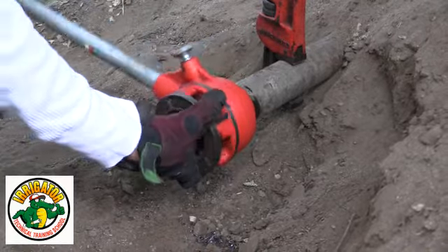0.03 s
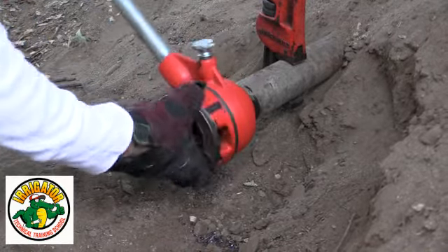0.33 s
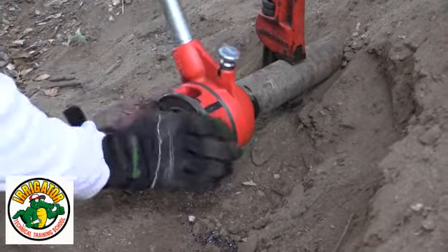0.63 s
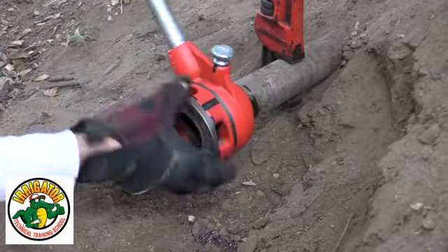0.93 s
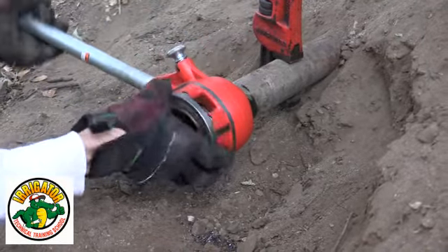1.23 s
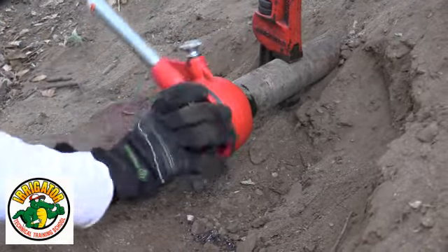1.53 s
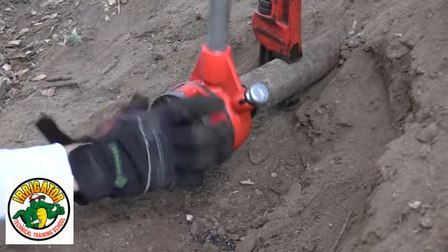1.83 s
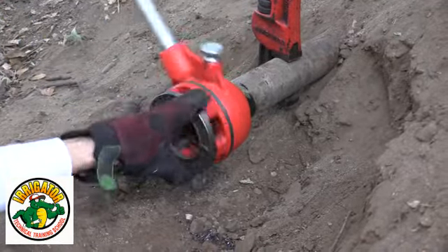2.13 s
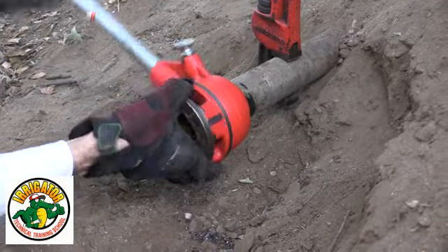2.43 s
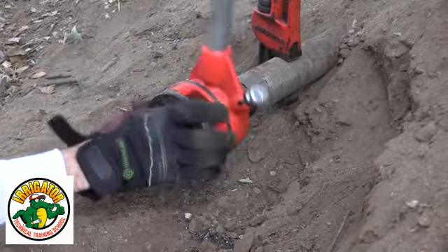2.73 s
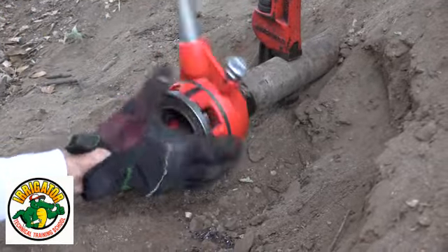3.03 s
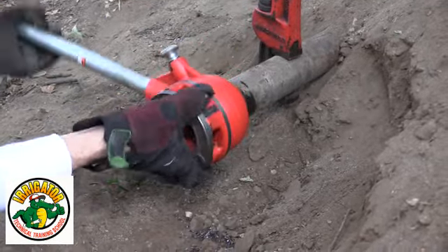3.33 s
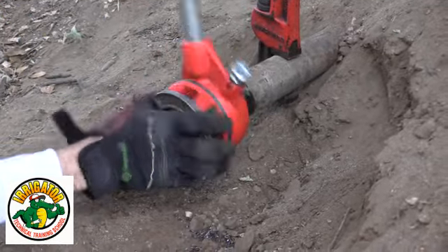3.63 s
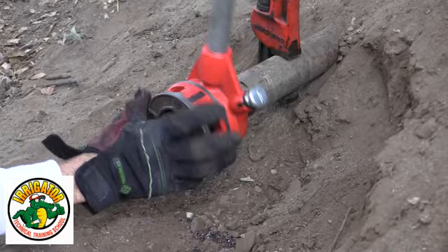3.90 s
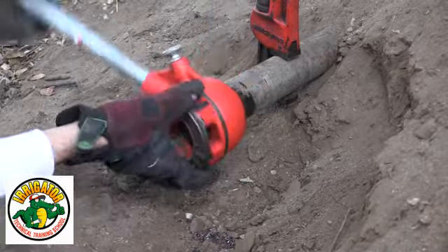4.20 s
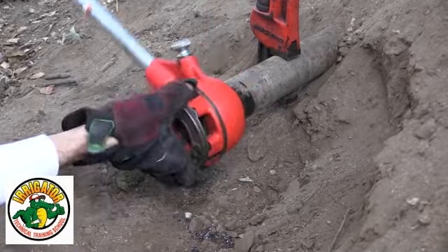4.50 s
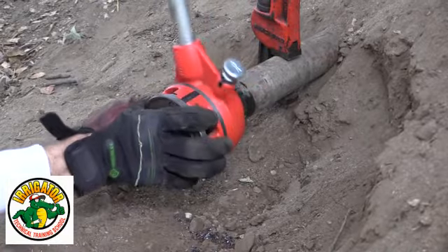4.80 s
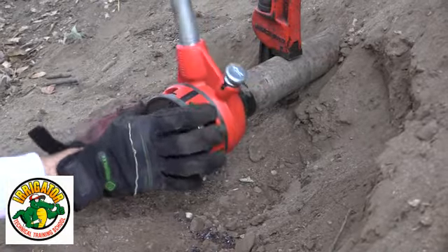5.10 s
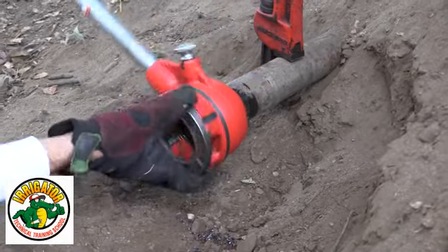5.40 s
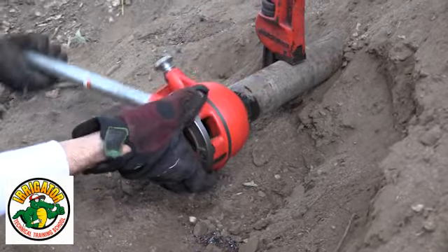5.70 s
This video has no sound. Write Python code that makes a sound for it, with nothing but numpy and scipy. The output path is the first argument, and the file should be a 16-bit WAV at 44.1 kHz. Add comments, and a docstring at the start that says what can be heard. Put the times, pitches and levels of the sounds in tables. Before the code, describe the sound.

A hand ratcheting pipe threader is worked off a steel pipe, close by in an earth trench, heard in the left channel only. A metal knock and soft glove bumps come at about 0.1 seconds. Then the ratchet clicks in five quick, slightly uneven bursts of seven to nine sharp, briefly ringing clicks: at 0.4 to 0.8, 1.5 to 1.9, 2.6 to 2.9, 3.6 to 3.8 and 4.6 to 5.0 seconds. These are the loudest sounds. Between bursts the loose head gives softer, duller knocks, around 1.3, 2.1, 2.4 and 3.4 seconds, with the strongest clunk at 4.3. The die rubs faintly and grittily on the thread with each stroke. Gloves brush the tool, most clearly near 0.8 seconds, and bump it with muffled thuds. A light breeze rumbles faintly throughout. A low thump and a few faint knocks come at about 5.6 seconds.

```python
"""In an earth trench, close by, a ratcheting pipe threader is backed off a steel pipe. On each return
swing the spring pawl drops over the teeth, and each impact excites the damped modes of the die head.
On each working stroke the loose head knocks as it takes up its play, and sliding friction makes the
die rub softly along the thread. Gloves bump and brush the tool, and moving air rumbles underneath.
The scene sounds in the left channel only."""
import sys
import numpy as np
from scipy import signal
from scipy.fft import rfft, irfft, next_fast_len
from scipy.io import wavfile
from scipy.ndimage import uniform_filter1d

SR = 44100
rng = np.random.default_rng(int(sys.argv[2]) if len(sys.argv) > 2 else 0)


def generate_wav(signal):
    """Clip the signal to [-1, 1] and save it as 16-bit WAV at the path in sys.argv[1]."""
    frames = np.transpose(np.atleast_2d(signal))
    scaled = np.clip(frames, -1, 1) * 32767
    pcm = np.round(scaled).astype(np.int16)
    wavfile.write(sys.argv[1], SR, pcm)


N = 253573
RING_SAMPLES = 12000  # length of one free vibration


# pawl impacts: t/s, level/dB, decay time factor, spectral tilt/(dB per octave), ping near 5 kHz/dB
PAWL_DROPS = [(0.4075, -21, 0.87, -0.5, 11.5), (0.4906, -20, 0.93, -1.5, 11),
              (0.5534, -19.5, 0.87, 0.4, 7.5), (0.6007, -21, 1.12, -0.3, 3), (0.6379, -20, 1.1, -0.3, 9),
              (0.676, -24.5, 1.1, 0.6, 1.5), (0.788, -29, 0.65, -1.5, 9), (1.5102, -17.5, 0.71, -1.5, -8.5),
              (1.5474, -18, 1.04, -0.1, 1.5), (1.583, -19.0, 1.4, -0.7, 3), (1.6202, -16.5, 0.95, 0.2, 3.5),
              (1.6616, -22, 0.77, 0, -5.5), (1.755, -21, 0.92, 1.5, 2.5), (1.8362, -21, 1.6, 0.4, 0),
              (1.928, -20, 0.9, 1.5, -5), (2.5647, -20.5, 0.86, -0.5, 16.5),
              (2.6112, -23.5, 0.85, -0.5, 13), (2.6619, -22.5, 1.2, -0.2, 5.5),
              (2.6977, -20, 0.77, 0.7, -4), (2.7293, -21.5, 0.77, 2.5, -10.5),
              (2.7639, -25.5, 0.68, 0.6, -1), (2.821, -22.5, 1.13, -0.3, -1.5), (2.8539, -21, 0.9, -0.6, 8),
              (2.8849, -25.0, 1.33, 0, 2), (3.5682, -18, 0.95, 0, 3.5), (3.6046, -17, 1.1, -0.1, 3),
              (3.6341, -20.5, 0.77, -1, -2), (3.6643, -20, 0.78, 0.3, -10), (3.7034, -19, 0.95, 0, 6),
              (3.7343, -19.0, 1.6, 1, -3.5), (3.7617, -21, 1.1, 1.5, -12), (3.7888, -20.5, 0.9, 0.6, -2.5),
              (3.8421, -25.5, 1, -0.5, 7), (4.6278, -21, 0.57, 1, 0), (4.725, -16.5, 0.68, -0.5, 6),
              (4.7576, -21.5, 1.1, -1, 15), (4.7815, -21.0, 1.5, -0.2, -10), (4.805, -23.5, 1.3, -0.3, 4),
              (4.834, -22, 1.04, 1, -7), (4.8742, -25.0, 0.88, 0.5, 2.5), (4.9862, -24, 0.68, 0, 4)]
# band edges of a drop: f/Hz
PAWL_EDGES = [50, 350, 2000, 2550, 4700, 5700, 9500, 17000]
# spectrum of a plain drop, by band: level/dB
PAWL_SPECTRUM = [-25, -8, -13, -1.5, -7.3, 0, -3]
# the duller spectrum of a rebound, by band: gain/dB
REBOUND_GAINS = [5, 9, 8, 3.5, -14, -5, -7]

def pawl(tones):
    """Impact excitation: the sprung pawl scrapes over a tooth, snaps down and rebounds once, weakly."""
    out, filters = np.zeros(N), bands(PAWL_EDGES)
    head_band, ping_band = 2, 4  # near 2.2 kHz and 5 kHz
    t = np.arange(RING_SAMPLES // 10) / SR
    tooth, last_s = 0, -np.inf
    for s, db, ring, tilt, ping_db in PAWL_DROPS:
        tooth = tooth + 1 if s - last_s < .4 else 0  # a longer gap begins a new swing
        last_s = s
        band_db = tilted(PAWL_SPECTRUM, PAWL_EDGES, tilt, pivot_hz=4000)
        # the head rings more as the handle rises, fully so once the die has worked loose
        band_db[head_band] += 1.61 * tooth * looseness(s)
        band_db[ping_band] += ping_db
        sound = impact(tones, ring, modes_db=3.3, rise_s=.0002, crack_db=8, body_t60=.043,
                       tail_db=-13.5, tail_t60=.19, scatter_db=8, detune=1.5)
        add(out, s, undb(db) * partition(sound, filters, band_db))
        delay_s, rebound_db = rng.uniform(.016, .027), rng.uniform(-27, -24.5)
        rebound = partition(sound, filters, band_db + REBOUND_GAINS)
        add(out, s + delay_s, undb(db + rebound_db) * rebound)
        scrape = unit(colour(rng.standard_normal(len(t)), BODY_SPECTRUM)) * fade(t, .051)[::-1]
        add(out, s - len(t) / SR, undb(db - 22.5) * scrape)
    return out


# impacts of head and handle: t/s, level/dB, spectral tilt/(dB per octave), clunk of the head/dB
HEAD_KNOCKS = [(0.1205, -46, -5, -5), (0.1359, -35, -5.5, -3), (0.1423, -25, 0.5, -6),
               (0.181, -46.5, -6.5, -12), (0.2531, -38, -0.5, -23), (0.335, -38.5, 1, -5),
               (0.358, -41.5, -1, -10), (1.027, -46.5, -2, 9.5), (1.315, -31, -2, 4),
               (1.3326, -42.5, 3.5, -3), (2.0769, -35.5, 4, -1), (2.109, -38, 2, -2),
               (2.116, -31, 0.5, 3.5), (2.358, -37, -2.5, -6), (2.39, -34, 0, 8), (2.471, -46, 5, 12.5),
               (2.498, -45.5, 8, 4), (2.525, -40.5, 1.5, -9), (3.27, -40, 4.5, -1), (3.3496, -34, 4, -3),
               (3.3629, -26.5, -1, 1.5), (3.461, -35.5, 2.5, -3), (3.547, -37, -0.5, -12.5),
               (3.898, -43.5, 1, -16), (4.2675, -34, 1.5, -0.5), (4.286, -29, 0, -9),
               (4.2909, -22.5, 1.4, 8), (4.299, -34.5, -2, 11.5), (4.3255, -39.5, -0.5, 1),
               (4.374, -42, -3, 10), (4.485, -42.5, 3.5, 4), (4.553, -35, 3.5, 7.5),
               (4.607, -40.5, 4.5, -6.5), (5.206, -49.5, -1, 6.5), (5.63, -45, -5.5, 0),
               (5.653, -46, -1, -4), (5.671, -48.5, -8, -17)]
# band edges of a knock: f/Hz
KNOCK_EDGES = [50, 350, 1250, 2200, 4500, 9500, 17000]
# spectrum of a plain knock, by band: level/dB
KNOCK_SPECTRUM = [-9, -4.5, -4, -0.5, -7, -16]

def knocks(tones):
    """Backlash: head and handle take up their play in softer, duller impacts, each with some chatter."""
    out, filters = np.zeros(N), bands(KNOCK_EDGES)
    clunk_band = 2  # 1.25-2.2 kHz
    for s, db, tilt, clunk_db in HEAD_KNOCKS:
        band_db = tilted(KNOCK_SPECTRUM, KNOCK_EDGES, tilt, pivot_hz=2200)
        band_db[clunk_band] += clunk_db
        sound = impact(tones, ring=.62, modes_db=-3, rise_s=.0017, crack_db=5, body_t60=.042,
                       tail_db=-18, tail_t60=.13, scatter_db=16, detune=2.4)
        knock = undb(db) * partition(sound, filters, band_db)
        add(out, s, knock)
        for chatter_s in .014 * rng.uniform(-.44, 1, 3):
            add(out, s + chatter_s, undb(-11.5) * rng.uniform(-.78, 1) * knock)
    return out


# spectral envelope of the dense, short-lived modes of casting, handle and pipe: f/Hz, level/dB
BODY_SPECTRUM = [(60, -20.5), (190, -3.5), (300, -19), (520, -6.5), (1000, -7.5), (1900, -3.5),
                 (3200, -3.5), (4000, -6.5), (5800, 0), (7600, -4.5), (9800, -10.5), (12600, -10),
                 (14000, -17.5), (16000, -24)]

def impact(tones, ring, modes_db, rise_s, crack_db, body_t60, tail_db, tail_t60, scatter_db, detune):
    """Impulse response of steel: overlapping modes merge into a clack, while separate ones ring clear."""
    t = np.arange(RING_SAMPLES) / SR
    dense = colour(rng.standard_normal(RING_SAMPLES), BODY_SPECTRUM)
    clack = unit(dense * (fade(t, body_t60 * ring) + undb(crack_db) * fade(t, .0024)))
    head = unit(head_modes(t, ring, scatter_db, detune))
    # the trench walls scatter a dull, noisy echo in among the ringing
    echo = colour(rng.standard_normal(RING_SAMPLES),
                  [(200, 2.5), (1000, 1), (2000, -2.5), (3300, 3), (4600, -17), (6500, -10),
                   (7600, -8.5), (14000, -21.5)])
    tubes = unit(rng.standard_normal(len(tones)) @ tones)
    tail = unit((tubes + unit(echo)) * fade(t, tail_t60))
    attack = 1 - np.exp(-t / rise_s)
    return (clack + undb(modes_db) * head + undb(tail_db) * tail) * attack


# normal modes of die head and pawl: f/Hz, energy level/dB, nominal T60/s
HEAD_MODES = [(505, -26, .06), (975, -20.5, .07), (1230, -20, .06), (1450, -17, .05), (1775, -15.5, .07),
              (2195, -8, .06), (2320, -12, .06), (2700, -12, .055), (3065, -14, .06), (3180, -25, .23),
              (3320, -20, .07), (3540, -20, .06), (4200, -31, .2), (5070, -13, .035), (5250, -3, .04),
              (5470, -15, .045), (6080, -13, .045), (6750, -7.5, .062), (8145, -10, .052), (8425, -11, .05),
              (10360, -15.5, .08), (11080, -14, .06), (11300, -20, .07), (12320, -13.5, .068),
              (12860, -12, .06), (13660, -23, .06), (14140, -39, .32), (14935, -23, .07), (15310, -26, .08)]

def head_modes(t, ring, scatter_db, detune):
    """Modal superposition: damped sinusoids whose strength and pitch vary with contact point and grip."""
    hz, db, t60 = np.transpose(HEAD_MODES)[:, :, None]
    strength, pitch = rng.standard_normal((2, len(HEAD_MODES), 1))
    phase = rng.uniform(0, 2 * np.pi, (len(HEAD_MODES), 1))
    hz = hz + detune * pitch / t60  # heavily damped modes lean on the contact and shift most
    t60 = ring * t60 * np.exp(rng.uniform(-.8, .23, t60.shape))  # the glove damps each mode differently
    amplitude = undb(db + scatter_db * np.tanh(strength)) / np.sqrt(t60)
    waves = np.sin((2 * np.pi * hz * t + phase).astype(np.float32))
    return np.sum(amplitude * fade(t, t60) * waves, axis=0)


def tube_tones(count=70):
    """Natural frequencies of handle and pipe: many thin, steady tones, one a row."""
    hz = rng.uniform(700, 7200, (count, 1))
    db = np.interp(hz, [700, 1800, 3100, 4500, 7200], [2.5, -7.5, -5.5, -1.5, -5.5])
    phase = rng.uniform(0, 2 * np.pi, (count, 1))
    return undb(db) * np.sin(2 * np.pi * hz * np.arange(RING_SAMPLES) / SR + phase)


def tilted(band_db, edges_hz, db_per_octave, pivot_hz):
    """Contact stiffness: a harder contact tilts the band levels towards the treble."""
    centres_hz = np.sqrt(np.multiply(edges_hz[:-1], edges_hz[1:]))
    return band_db + db_per_octave * np.log2(np.maximum(centres_hz, 550) / pivot_hz)


def partition(sound, filters, band_db):
    """Energy partition: the contact point sets each band's level over the first 20 ms of an impact."""
    parts = np.array([signal.sosfilt(sos, sound) for sos in filters])
    onset_rms = np.sqrt(np.mean(parts[:, :int(.02 * SR)] ** 2, axis=1))
    return (undb(band_db) / onset_rms) @ parts


def looseness(s, loose_at_s=3.1):
    """Mechanical clearance: the die's play on the thread grows from 0 to 1 with time s."""
    return np.minimum(s / loose_at_s, 1) ** 2


# spectrum of steel sliding on the thread: f/Hz, level/dB
FRICTION_SPECTRUM = [(300, 1), (700, 1), (1000, 0), (1600, -1), (2100, -1), (2650, -3), (4400, 0),
                     (6000, -3), (8500, -6), (12000, -10), (16000, -16)]
# pipe resonances under a fully loose die: f/Hz, bandwidth/Hz, level/dB relative to the rub
PIPE_RESONANCES = [(2170, 54, -8), (3110, 25, -10.5), (4170, 380, -11.5)]

def sliding_die(rub_db, hiss_db):
    """Forced vibration: gritty friction on the thread drives head and pipe, more as the die rubs harder."""
    grit = (rng.random(N) < 260 / SR) * rng.standard_normal(N)  # about 260 specks a second
    friction = rng.standard_normal(N) * undb(2.4 * walk(41) + 1.5 * walk(1500)) + undb(-12) * unit(grit)
    t, ringing = np.arange(RING_SAMPLES) / SR, 0
    for _ in range(4):  # four cutters bear unevenly on the pipe, each stirring its own mix of modes
        response = unit(head_modes(t, ring=.71, scatter_db=10, detune=3))
        load = undb(4 * np.tanh(walk(13)))
        ringing = ringing + signal.fftconvolve(friction * load, response)[:N]
    ringing = colour(ringing, [(1000, -4), (1600, 1), (2300, -4), (3300, 0), (4200, 2), (5200, -10),
                               (14000, -16)])
    ringing_db = -13.5 + .92 * (rub_db - np.mean(rub_db))
    sound = unit(colour(friction, FRICTION_SPECTRUM)) + undb(ringing_db) * unit(ringing)
    rub, hiss = (unit(signal.sosfilt(sos, sound)) for sos in bands([350, 3000, 17000]))
    pipe = sum(undb(db) * unit(signal.lfilter(*signal.iirpeak(hz, hz / width, fs=SR), friction))
               for hz, width, db in PIPE_RESONANCES)
    return undb(rub_db) * (rub + looseness(np.arange(N) / SR) * pipe) + undb(hiss_db) * hiss


# handle strokes: t/s leaving the top, t/s lowest, t/s back at the top, peak rub/dB, hiss/dB, rumble/dB
HANDLE_STROKES = [(-0.1, 0.329, 1.07, -50.5, -61, -52), (0.974, 1.48, 2.06, -49.5, -52.5, -47.5),
                  (2.053, 2.51, 2.86, -52.5, -55.5, -47), (3.064, 3.54, 3.9, -49.5, -53, -49),
                  (3.988, 4.395, 4.85, -45.5, -47, -46.5), (5.073, 5.632, 6.04, -52.5, -52.5, -53.5)]
# growth from the top of a stroke to its lowest point: rub/dB, hiss/dB, rumble/dB
STROKE_GROWTH = [5.5, 3.5, 7.5]
# floor while the handle pauses at the top: rub/dB, hiss/dB, rumble/dB
REST_LEVELS = [-65, -60.5, -54.5]
# the die binds and scrapes dully: t/s of the peak, half length/s, level/dB
DIE_SCUFFS = [(0.918, 0.017, -42.5), (1.3, 0.021, -45), (1.475, 0.0092, -43), (2.35, .03, -46.5),
              (2.465, 0.0094, -53), (3.443, 0.013, -37.5), (4.58, 0.03, -45)]
# a glove brushes the head to take a new grip: t/s of the peak, half length/s, level/dB
GLOVE_BRUSHES = [(0.065, .06, -49), (0.821, 0.056, -39), (2.217, .07, -49.5), (3.175, 0.053, -51.5),
                 (3.32, 0.023, -45.5), (4.16, 0.021, -49), (5.417, 0.13, -57)]

def handling(attack_s=.061, release_s=.052):
    """Incoherent addition: strokes, scuffs and brushes sum in power to rub, hiss and rumble levels/dB."""
    t = np.arange(N) / SR
    power = undb(REST_LEVELS)[:, None] ** 2 * np.ones(N)
    for start, lowest, end, *peak_db in HANDLE_STROKES:
        moving = np.clip(np.minimum((t - start) / attack_s, (end - t) / release_s), 0, 1)
        height = np.interp(t, [start, lowest, end], [1, 0, 1])
        stroke_db = np.array(peak_db)[:, None] - np.outer(STROKE_GROWTH, height)
        power += (moving * undb(stroke_db)) ** 2
    rub, hiss, low = power
    return 10 * np.log10([rub + swells(DIE_SCUFFS, t), hiss + swells(GLOVE_BRUSHES, t), low])


def swells(table, t):
    """Gaussian pulses of power, summed over the rows of a table."""
    return sum(undb(db) ** 2 * np.exp(-((t - s) / half_s) ** 2) for s, half_s, db in table)


# gloves bump the tool and the ground: t/s, relative level/dB, f/Hz
GLOVE_BUMPS = [(0.126, -32, 178), (0.178, -30, 173), (0.29, -41, 125), (1.28, -35, 164), (1.421, -41, 162),
               (2.391, -42, 155), (3.233, -36, 175), (3.361, -37, 130), (3.66, -29.5, 156),
               (4.111, -31.5, 150), (4.149, -32.5, 183), (4.42, -38, 118.5), (5.631, -36, 144),
               (5.655, -26, 85)]

def glove_bumps():
    """Damped oscillation: a soft contact starts a low tone that swells and dies within a few cycles."""
    out, t = np.zeros(N), np.arange(RING_SAMPLES) / SR
    envelope = fade(t, .091) * (1 - np.exp(-t / .013))
    for s, db, hz in GLOVE_BUMPS:
        add(out, s, undb(db + 8) * np.sin(2 * np.pi * hz * t) * envelope)
    return out


# spectrum of moving air and gloves: f/Hz, level/dB
RUMBLE_SPECTRUM = [(15, -31), (35, 0), (65, -4), (110, -3), (180, -0.5), (240, -8), (320, -14), (600, -20),
                   (2000, -67)]

def rumble(gloves_db, air_db=-57.5, crossover_hz=70):
    """Flow and handling noise: a light breeze fills the deep bass, and gloves swell unevenly above it."""
    noise = colour(rng.standard_normal(N), RUMBLE_SPECTRUM) * undb(2.5 * walk(25))
    crossover = (signal.butter(3, crossover_hz, kind, fs=SR, output="sos") for kind in ("low", "high"))
    air, gloves = (unit(signal.sosfilt(sos, noise)) for sos in crossover)
    return undb(air_db) * air + undb(gloves_db) * gloves


def undb(db):
    """Amplitude ratio of a level in decibels."""
    return 10 ** (np.asarray(db) / 20)


def unit(x):
    """Normalisation to rms 1."""
    return x / np.sqrt(np.mean(x ** 2) + 1e-20)


def fade(t, t60):
    """Exponential decay, 60 dB down after t60."""
    return np.exp(-np.log(1000) * t / t60)


def colour(x, points):
    """Spectral shaping by a curve through points of f/Hz, gain/dB."""
    hz, db = np.transpose(points)
    size = next_fast_len(len(x), True)
    f = np.maximum(np.fft.rfftfreq(size, 1 / SR), 1)
    gain = undb(np.interp(np.log(f), np.log(hz), db))
    return irfft(rfft(x, size) * gain, size)[:len(x)]


def bands(edges_hz):
    """Filter bank: one band-pass between each pair of neighbouring edges."""
    return [signal.butter(5, pair, "bandpass", fs=SR, output="sos")
            for pair in zip(edges_hz, edges_hz[1:])]


def walk(rate):
    """Random modulation of rms 1, gliding to a new value every 1 / rate s."""
    hold = max(int(SR / rate), 1)
    steps = np.repeat(rng.standard_normal(N // hold + 1), hold)
    return unit(uniform_filter1d(steps, hold)[:N])


def add(out, s, sound):
    """Superposition of a sound on the output, starting at time s."""
    i = int(s * SR)
    out[i:i + len(sound)] += sound[:N - i]


def scene():
    """Linear superposition: all sources add in the left channel; the right one is silent."""
    rub_db, hiss_db, rumble_db = handling()
    tones = tube_tones()
    steel = pawl(tones) + knocks(tones) + sliding_die(rub_db, hiss_db)
    return np.array([steel + glove_bumps() + rumble(rumble_db), np.zeros(N)])


def record(dry, cutoff_hz=15800):
    """Noise floor and band limit: preamplifier hiss on both channels, clipping and a steep low-pass."""
    hiss = undb(-75.5) * rng.standard_normal(dry.shape)
    lowpass = signal.ellip(10, .1, 70, cutoff_hz, fs=SR, output="sos")
    return signal.sosfilt(lowpass, np.clip(dry + hiss, -1, 1))


dry = scene()
out = record(dry)
generate_wav(out)
```